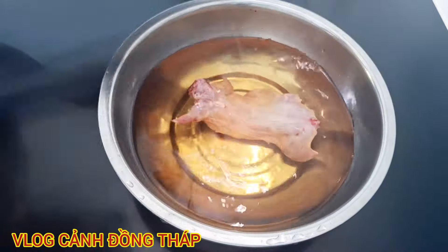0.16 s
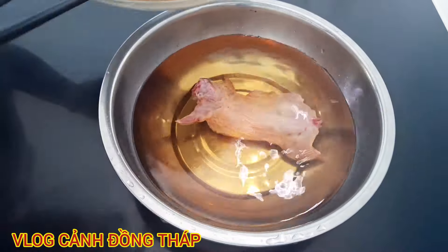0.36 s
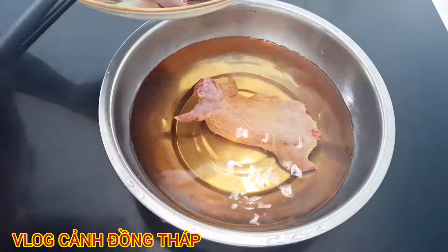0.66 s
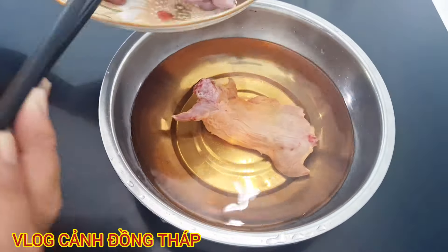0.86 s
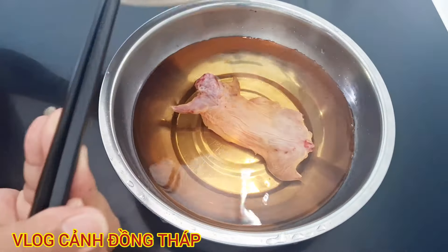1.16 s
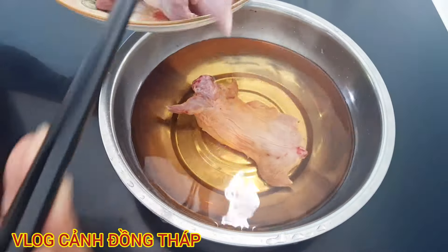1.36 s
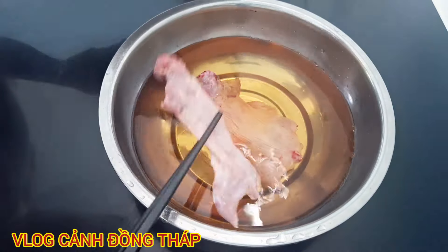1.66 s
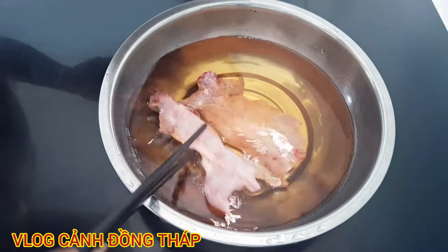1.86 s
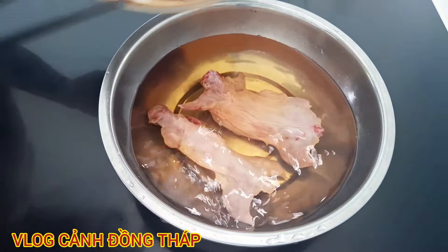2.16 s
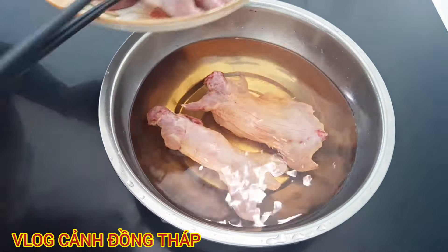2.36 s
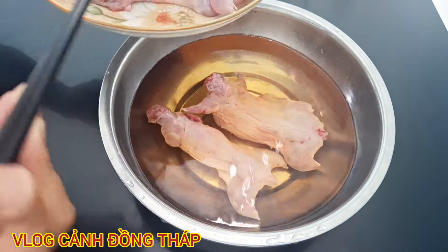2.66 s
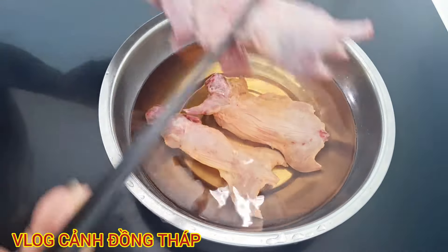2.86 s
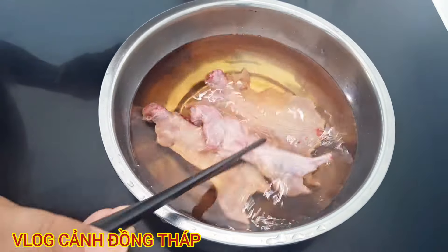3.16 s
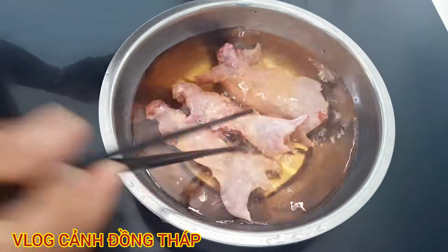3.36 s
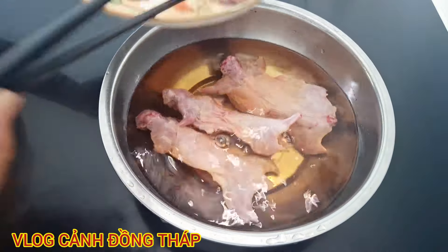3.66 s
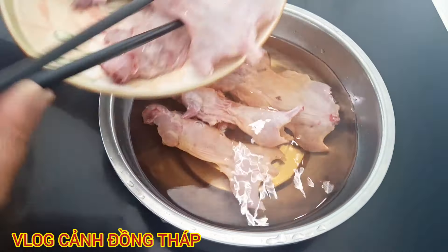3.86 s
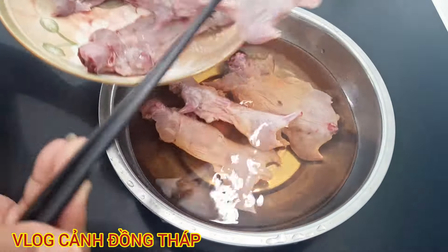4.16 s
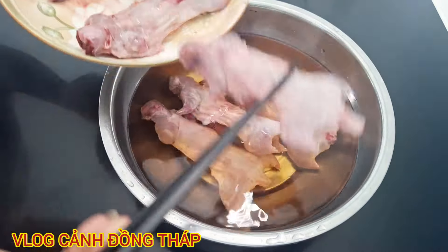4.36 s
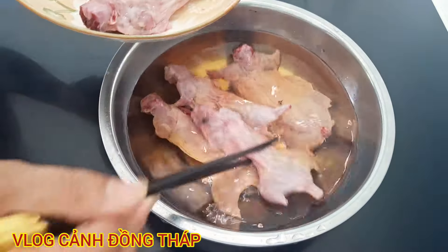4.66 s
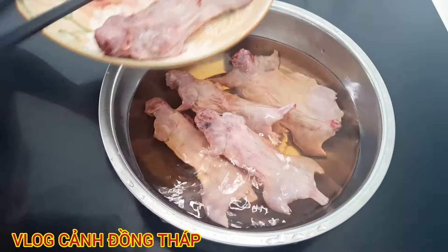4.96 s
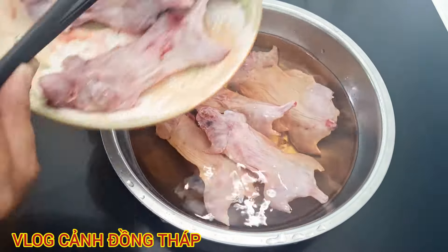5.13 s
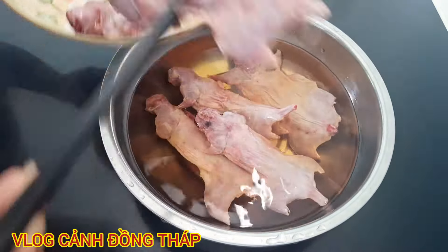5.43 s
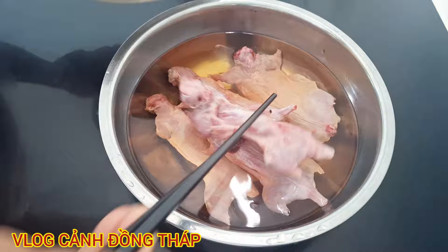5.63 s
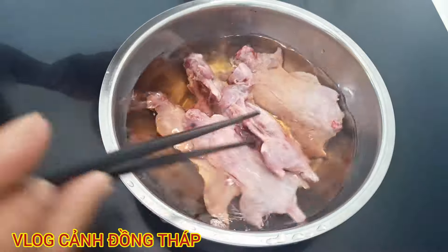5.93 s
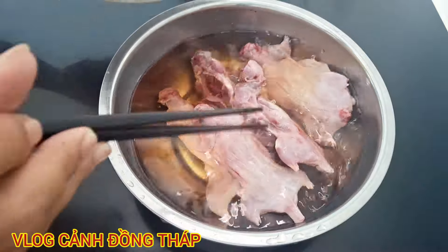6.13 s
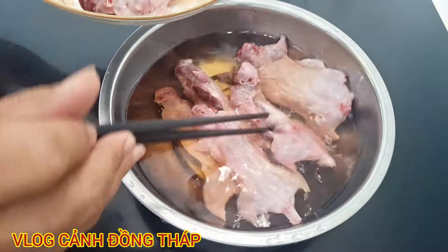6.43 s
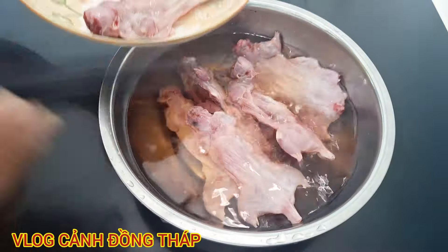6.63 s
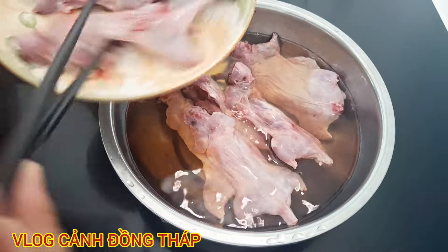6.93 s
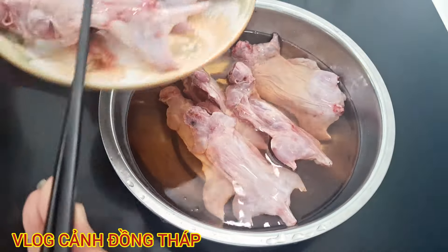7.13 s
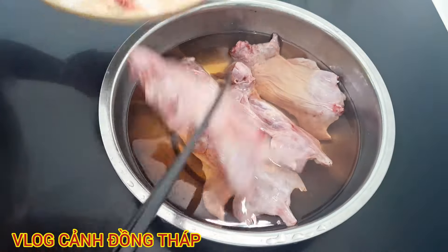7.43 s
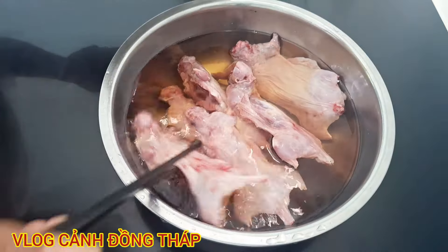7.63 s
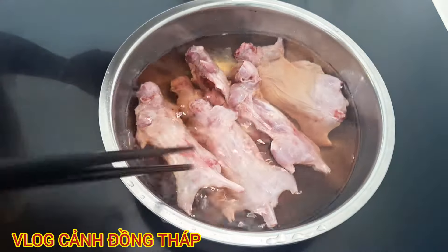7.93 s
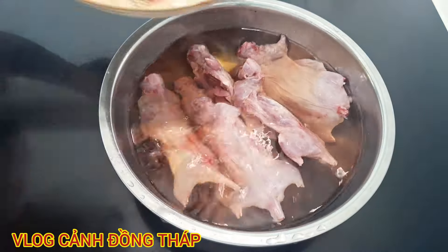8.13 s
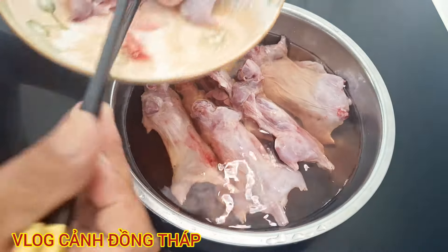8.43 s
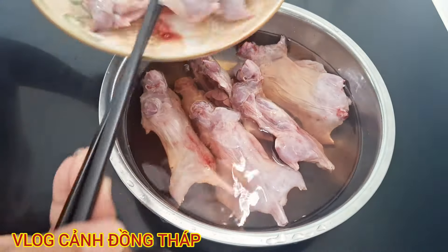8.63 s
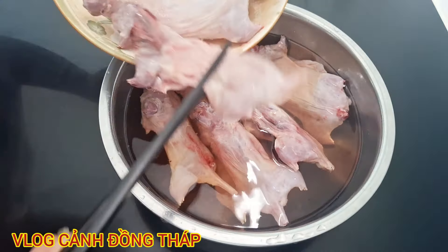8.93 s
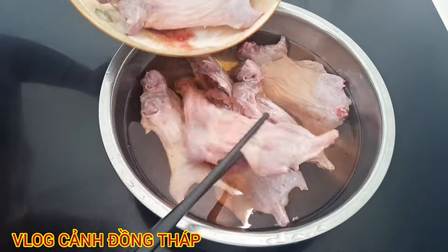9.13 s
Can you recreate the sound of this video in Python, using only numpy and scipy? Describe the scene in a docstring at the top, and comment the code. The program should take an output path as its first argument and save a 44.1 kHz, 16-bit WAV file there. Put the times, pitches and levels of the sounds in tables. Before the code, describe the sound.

Chopsticks move raw meat from a china plate into a steel bowl of water, close to the microphone. Two short clicks on the plate come at about 0.5 seconds, then faint wet ticks, and a quick cluster of clinks around 2.3 seconds. Small wet smacks and bubbles follow near 3.2 and 4.6 seconds. From 5.8 to 6.7 seconds the meat is pressed under with little pops and faint, fizzy squelches. The sharpest clink lands at 6.9 seconds, with another just after. The strongest wet smacks and bubbling come between 7.6 and 8.2 seconds, followed by a click at 8.4 and a few lighter taps until about 9 seconds. The hard kitchen walls add a short echo. A quiet low rumble, an appliance hum, a faint whine and a thin hiss run throughout.

```python
"""In a hard-walled kitchen, chopsticks lift raw meat off a china plate into a steel bowl of water.
Each contact, close to the microphone, cracks and briefly excites the bending modes of stick and plate.
Wet films burst in smacks, air pockets resonate as bubbles, and meat pressed under water squelches.
The walls reverberate, over a low rumble, an appliance hum, a faint whine and a thin hiss."""
import sys
import numpy as np
from scipy import signal
from scipy.fft import rfft, irfft, next_fast_len
from scipy.io import wavfile
from scipy.ndimage import map_coordinates

SR = 44100
rng = np.random.default_rng(int(sys.argv[2]) if len(sys.argv) > 2 else 0)


def master_out(mix):
    """Clip the mix to full scale and print it as 16-bit PCM to the path in sys.argv[1]."""
    frames = np.transpose(np.atleast_2d(mix))
    ceiling = np.clip(frames, -1, 1)
    pcm = np.round(ceiling * 32767).astype(np.int16)
    wavfile.write(sys.argv[1], SR, pcm)


N = 409688

# Sticks striking the plate: (time [s], level [dB], rim angle [deg], brightness [dB/octave],
# stick resonance [Hz], top mode gain [dB], rise [s], chatter on the glaze [s], crack gain [dB])
CONTACTS = [(0.462, -33, 20.7, 0, 5400, -18.5, .001, 0.0043, 5),
            (0.551, -37.5, 27.7, -2, 4000, -13, .0076, 0.0075, -2),
            (2.272, -29.5, 25.3, 0.5, 3800, -3, .0017, 0.0052, 3),
            (2.288, -43.5, 28.5, -2, 4000, -1, .001, 0.025, 5),
            (2.319, -42, 28, -2, 4230, -9, .0007, 0.0084, 7),
            (2.344, -46.5, 45, -1.5, 3100, -10, .0007, .0085, 5),
            (2.363, -49.5, 44, -2, 3100, -4, .0013, 0.013, 2),
            (2.47, -40.5, 20, -2.5, 6400, -21, .0004, 0.0017, 8),
            (4.154, -66.5, 19.6, -10, 1800, -13, .0017, 0.015, 5),
            (4.466, -59.5, 23, 2, 6400, -6, .0013, 0.0033, -3),
            (6.895, -26, 66.6, 0.4, 7700, -8, 0.0015, 0.0049, -2),
            (7.116, -33.5, 86.6, -1, 4000, -3, 0.0026, 0.0064, -3),
            (7.1295, -43.5, 45, -5.5, 1830, -7, .0009, 0.0041, 6),
            (8.402, -35.5, 76.5, 1, 5200, -2, 0.0008, 0.0026, 0),
            (8.66, -46.5, 40.7, -5.5, 1830, -3, .001, 0.005, 4),
            (8.675, -55, 58.4, -15, 1830, -3.5, .0006, .0017, 8),
            (8.867, -65.5, 23, -2, 6400, -2, .0008, .0022, 2),
            (8.911, -59, 19.6, -9, 6400, -5, .001, 0.007, 2)]
# Modes of stick and plate together: (frequency [Hz], relative level [dB], t60 [s])
PLATE_MODES = [(626,-11.5,0.028), (1280,-17,.025), (1744,-9.5,0.023), (1844,-6,0.022), (3025,-7.5,.04),
               (3113,-0.5,0.044), (4008,0,0.03), (4756,-12.5,0.022), (5070,-4,0.036), (5193,-2.5,0.039),
               (5740,-14,0.024), (6214,-5,.024), (6393,-1.5,0.025), (6900,-5.5,.02), (7460,-6,0.018),
               (7720,-3.5,0.033), (8230,-17,.02), (9130,-15.5,.035), (10970,-13,0.023), (11720,-13.5,0.012),
               (12400,-13.5,0.018)]
# Standing bending waves of the rim: (frequency [Hz], waves round the rim [count])
RIM_WAVES = [(1830, 4), (3090, 5), (4000, 6), (5200, 7), (6360, 8), (7600, 9)]
# Spectrum of the contact itself: (frequency [Hz], relative density [dB])
CRACK_SPECTRUM = [(250,-19.5), (600,-5), (1500,7.5), (2500,9.5), (4500,13.5), (7700,-5.5), (8200,-0.5),
                  (12500,2), (14500,-5.5), (15800,-9)]
# Wet meat meeting water, meat and sticks:
# (time [s], level [dB], cavity resonance [Hz], treble spray gain [dB], lifetime [s])
WET_CONTACTS = [(0.81, -58, 7090, -7, .008), (1.0425, -52, 6750, -18, .004), (1.885, -62, 7560, -21, .03),
                (2.055, -50.5, 6860, -28.5, 0.022), (3.1536, -46.5, 5840, -26.5, .004),
                (3.163, -45.5, 4120, -6, .005), (3.2, -49.5, 4870, -23, .012),
                (3.845, -51, 4660, -35, .004), (3.921, -60, 6960, -9, 0.0027),
                (4.225, -57.5, 7500, -8, .003), (4.6043, -46, 6500, -20, .006),
                (4.6528, -46, 5300, -21, .006), (4.666, -53.5, 6500, -15.5, .03),
                (5.8852, -45, 4670, -38, 0.0026), (5.9178, -43.5, 4100, -29, .004),
                (6.3136, -51.5, 5000, -8, .004), (6.346, -49.5, 6000, -29, .004),
                (7.6313, -42.5, 6370, -17.5, .004), (7.6494, -48, 6900, -22, .005),
                (7.71, -38, 7200, -24.5, .01), (7.8234, -32.5, 7300, -22, 0.0086),
                (7.952, -41.5, 7100, -21, .012), (8.1032, -46.5, 7000, -21, .003)]
# Spectrum of a bursting film: (frequency [Hz], relative density [dB])
FILM_SPECTRUM = [(400, -23), (1200, -20.5), (3000, -1.5), (5000, -1.5), (7500, -1), (8400, -6.5),
                 (12000, 3), (15500, -6.5)]
# Ringing air pockets: (time [s], level [dB], starting frequency [Hz], t60 [s])
AIR_POCKETS = [(3.203, -43, 2800, 0.0073), (3.265, -57.5, 1420, 0.15), (3.364, -60.5, 2210, 0.13),
               (4.605, -56, 1390, .04), (5.919, -40.5, 3420, 0.011), (6.321, -46, 4700, .012),
               (7.714, -55, 2830, 0.05), (7.751, -54, 3370, .02), (7.775, -46, 4600, 0.028),
               (7.824, -43, 1464, 0.024), (8.175, -44.5, 2160, 0.038), (8.176, -54, 1050, 0.036)]
# Sticks pressing the meat under water: (time [s], duration [s], level [dB])
PRESSES = [(5.814, .026, -70.5), (5.871, 0.069, -67), (6.083, .1, -69.5), (6.191, 0.082, -75.5),
           (6.288, .056, -71), (6.453, 0.22, -70), (6.683, .079, -67.5), (7.733, .075, -57.5),
           (7.866, 0.034, -64), (8.119, .038, -65)]
# Colour of the bubble cloud: (frequency [Hz], gain [dB])
FIZZ_COLOUR = [(1500, -18), (3200, -0.5), (5500, -4), (7200, 6.5), (8400, -9.5), (10300, -10.5),
               (11700, -5.5), (13000, -15.5), (15500, -19.5)]
# Spectra of room noise, its stereo spread and microphone hiss: (frequency [Hz], relative density [dB])
AIR_SPECTRUM = [(15, -53.5), (25, -12.5), (54, -5.5), (102, -1), (145, -5.5), (178, -6.5), (214, -7.5),
                (290, -16), (411, -11), (437, -12.5), (474, -12), (743, -19), (1160, -16.5), (1980, -18.5),
                (3300, -30.5), (4290, -64.5), (7260, -120)]
SIDE_SPECTRUM = [(25, -8), (70, 13), (200, 3), (500, -5.5), (2000, -33), (7000, -24.5), (15000, -20)]
HISS_SPECTRUM = [(2600,-27.5), (3600,-8.5), (3880,0.5), (4250,-2), (4450,-6), (5200,-18), (7600,-13),
                 (8400,-31), (10500,-29.5), (11600,-21.5), (12400,-31.5), (15500,-28)]
# Envelopes of the appliance hum and the room rumble: (time [s], relative level [dB])
HUM_ENVELOPE = [(0, -69), (.4, -84), (.7, -63), (1.4, -73), (2.2, -64.5), (2.4, -71), (2.77, -62),
                (3.1, -85), (3.25, -58.5), (4, -63.5), (4.85, -73), (5.15, -62.5), (5.5, -69), (6.6, -60.5),
                (6.85, -71), (7.6, -65), (8, -80), (9.29, -68.5)]
RUMBLE_ENVELOPE = [(0, 1), (.3, -3.5), (.6, 3.5), (1.7, 1), (2.75, 3), (3.05, -10.5), (3.2, 1), (3.4, 2.5),
                   (4.4, 2), (4.75, -1.5), (5.3, 2.5), (6.2, 5), (7.3, 2), (8.2, -1), (9.29, 4)]
# Steady drone and whine: (frequency [Hz], level [dB])
STEADY_TONES = [(61, -71.5), (3985, -79.5), (4273, -75.5)]
# Reverberation time of the kitchen: (frequency [Hz], t60 [s])
KITCHEN_T60 = [(200, .45), (1500, 1), (3500, 0.64), (7000, 0.61), (12000, 0.52), (16000, 0.9)]
# Imbalance of the two microphone ports: (frequency [Hz], left minus right [dB])
PORT_BALANCE = [(100,-.6), (190,-2.5), (350,0), (4700,0), (5800,1.5), (6400,5), (7850,11), (8300,3),
                (9300,-5), (11500,-6), (12200,-2), (13500,0)]


def chopsticks(ring_db=3, crack_t60=0.033, grip_detune=0.0033, wet_db=-6.5):
    """Impact excitation: a broadband crack and modal ringing, damped by the hand and the meat."""
    track, t = np.zeros(N), np.arange(SR // 10) / SR
    hz, mode_db, t60 = np.transpose(PLATE_MODES)[:, :, None]
    for s, db, angle, brightness, stick_hz, top_db, rise, chatter, crack_db in CONTACTS:
        drive = strike_spectrum(angle, brightness, stick_hz, top_db, chatter)
        pitch = hz * (1 + grip_detune * rng.standard_normal(hz.shape))  # grip and load vary
        phase = rng.random((len(hz), 1))
        free_time = np.maximum(t - chatter, 0)  # decay begins once the chatter stops
        envelopes = amp(mode_db + along(drive, hz) - 60 * free_time / t60)
        ring = (envelopes * np.sin(2 * np.pi * (pitch * t + phase))).sum(0)
        tint = lambda f: amp((along(drive, f) + drive[:, 1].mean()) / 2)  # half the modes' contrast
        crack = filtered(noise(CRACK_SPECTRUM, len(t)), tint) * amp(-60 * free_time / crack_t60)
        onset = 1 - np.exp(-(t / rise) ** 2)
        clink = amp(db) * onset * (amp(ring_db) * ring + amp(crack_db) * crack)
        add(track, s, in_kitchen(clink, wet_db))
    return track


def strike_spectrum(angle, brightness, stick_hz, top_db, chatter, node_db=-18, width_oct=0.12):
    """Modal coupling, as (Hz, dB) points: a standing wave struck at its node is barely excited."""
    rim_hz, waves = np.transpose(RIM_WAVES)
    coupling_db = 10 * np.log10(np.cos(np.radians(waves * angle)) ** 2 + amp(node_db) ** 2)
    stick_db = 3.5 * np.exp(-(np.log2(rim_hz / stick_hz) / width_oct) ** 2)  # the stick's resonance
    low_db = -11.5 + 2.5 * np.log2(chatter / 0.0081)  # longer contact favours the lowest modes
    hz = np.r_[900, rim_hz, 9100]
    tilt_db = brightness * np.log2(hz / 4000)  # a harder touch is brighter
    return np.c_[hz, np.r_[low_db, coupling_db + stick_db, top_db] + tilt_db]


def smacks(level_db=-6, cavity_db=8, cavity_width_hz=550, spray_db=10, wet_db=-6):
    """Cavity resonance: wet films burst in a brief crackle, coloured by the pocket they close."""
    track, t = np.zeros(N), np.arange(SR // 12) / SR
    for s, db, cavity_hz, top_db, life in WET_CONTACTS:
        pocket = lambda f: cavity_db / (1 + ((f - cavity_hz) / cavity_width_hz) ** 2)
        spray = [(7500, 0), (10000, top_db + spray_db)]
        film = noise(FILM_SPECTRUM, len(t))
        crackle = unit(filtered(film, lambda f: amp(pocket(f) + along(spray, f))))
        burst = (1 - np.exp(-t / 0.00049)) * np.exp(-(t / life) ** 2)
        add(track, s, in_kitchen(amp(db + level_db) * burst * crackle, wet_db))
    return track


def bubbles(wet_db=-10):
    """Mass-spring resonance: trapped air pulsates against water, rising in pitch near the surface."""
    track, t = np.zeros(N), np.arange(SR // 10) / SR
    for s, db, hz, t60 in AIR_POCKETS:
        climb_oct_per_s = 4 * t60 / 0.035  # longer-lived bubbles climb faster
        note = np.sin(2 * np.pi * np.cumsum(hz * 2 ** (climb_oct_per_s * t)) / SR)
        envelope = amp(db - 60 * t / t60) * (1 - np.exp(-t / 0.00056))
        add(track, s, in_kitchen(envelope * note, wet_db))
    return track


def squelch(bubbles_per_s=6040, knead_per_s=20, knead_db=1.5, fade_share=0.38, wet_db=-6):
    """Incoherent superposition: tiny bubbles merge into a fizz as the sticks push the meat down."""
    track, t = np.zeros(N), np.arange(SR // 100) / SR
    for s, length, db in PRESSES:
        cloud = np.zeros(round(length * SR))
        for when, pitch, size in rng.random((int(bubbles_per_s * length) + 1, 3)):
            hz = 2500 * 6 ** pitch
            note = np.sin(2 * np.pi * hz * t) * np.exp(-hz * t / 5)
            add(cloud, when * length, size ** 2 * np.sqrt(hz) * note)
        pressure = amp(knead_db * wobble(knead_per_s)[:len(cloud)])
        fizz = unit(pressure * filtered(cloud, lambda f: amp(along(FIZZ_COLOUR, f))))
        fade = signal.windows.tukey(len(fizz), fade_share)
        add(track, s, in_kitchen(amp(db) * fade * fizz, wet_db))
    return track


def drips(count=40, t60=0.008, wet_db=-8):
    """Damped oscillation: small drops ring briefly as they fall from the lifted meat into the water."""
    track, t = np.zeros(N), np.arange(SR // 20) / SR
    for when, pitch, size in rng.random((count, 3)):
        hz = 3800 * 2 ** pitch
        db = -69 - 3 * np.log(size + 0.03)  # most are tiny, a few stand out
        pop = np.sin(2 * np.pi * hz * t) * amp(db - 60 * t / t60)
        add(track, when * N / SR, in_kitchen(pop, wet_db))
    return track


def in_kitchen(sound, wet_db, build_up_s=0.0023):
    """Reverberation: wall reflections form an exponential tail, different for each source position."""
    hz, t, spectra = signal.stft(rng.standard_normal(SR * 3 // 4), SR, nperseg=256)
    decay = amp(-60 * t / along(KITCHEN_T60, hz)[:, None])
    tail = signal.istft(spectra * decay, SR, nperseg=256)[1]
    tail *= 1 - np.exp(-(np.arange(len(tail)) / SR / build_up_s) ** 2)
    response = amp(wet_db) * tail / np.linalg.norm(tail)
    response[0] += 1  # the direct sound
    return signal.fftconvolve(sound, response)


def background(air_db=-65, hiss_db=-73.5, hum_hz=181.4, hum_gain_db=-3, flutter_db=0.5):
    """Slow modulation: room rumble and appliance hum waver under faint tones and microphone hiss."""
    t = np.arange(N) / SR
    hum_db = np.interp(t, *np.transpose(HUM_ENVELOPE)) + hum_gain_db
    rumble_db = np.interp(t, *np.transpose(RUMBLE_ENVELOPE))
    air = amp(air_db) * noise(AIR_SPECTRUM, N)
    rumble = filtered(air, lambda hz: 1 / (1 + (hz / 150) ** 4))
    swell = amp(rumble_db - flutter_db * wobble(8)) - 1  # the air already holds the rumble once
    hum = amp(hum_db) * np.sin(2 * np.pi * hum_hz * t + 0.78 * wobble(5))
    tones = sum(amp(db) * np.sin(2 * np.pi * hz * t + 0.84 * wobble(7.7)) for hz, db in STEADY_TONES)
    return air + swell * rumble + hum + tones + amp(hiss_db) * noise(HISS_SPECTRUM, N)


def amp(db):
    """Decibels to amplitude ratio."""
    return 10 ** (np.asarray(db) / 20)


def unit(x):
    """Normalisation to rms 1."""
    return x / np.sqrt(np.mean(x ** 2) + 1e-20)


def along(points, hz):
    """Interpolation of (Hz, value) points on a log frequency axis."""
    f, v = np.transpose(points)
    return np.interp(np.log(hz + 1), np.log(f + 1), v)


def wobble(knots_per_s):
    """Spline interpolation of random knots: a smooth fluctuation."""
    knots = rng.standard_normal(int(N * knots_per_s / SR) + 4)
    return map_coordinates(knots, [np.arange(N) * knots_per_s / SR])


def filtered(x, response):
    """Linear filtering: the spectrum of x times a frequency response."""
    n = x.shape[-1]
    padded = next_fast_len(n + 8192)
    return irfft(rfft(x, padded) * response(np.fft.rfftfreq(padded, 1 / SR)), padded)[..., :n]


def noise(spectrum, size):
    """Spectral shaping of white noise, at rms 1."""
    return unit(filtered(rng.standard_normal(size), lambda hz: amp(along(spectrum, hz))))


def add(track, s, sound):
    """Superposition of a sound on a track at time s."""
    part = track[max(round(s * SR), 0):][:len(sound)]
    part += sound[:len(part)]


def scene():
    """Coherence: the sources reach two close ports in phase; only the rumble has some width."""
    side = amp(-81.5) * noise(SIDE_SPECTRUM, N)
    mid = background() + chopsticks() + smacks() + bubbles() + drips() + squelch()
    return np.array([mid + side, mid - side])


def record(dry):
    """Frequency response: each port colours the treble in its own way, below a common band limit."""
    def ports(hz):
        gains = amp(np.outer([0.5, -0.5], along(PORT_BALANCE, hz)))
        return gains / gains.mean(0)
    return filtered(filtered(dry, ports), lambda hz: hz < 16050)


dry = scene()
out = record(dry)
master_out(out)
```